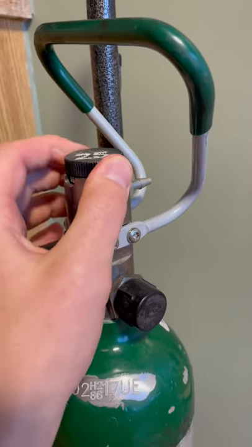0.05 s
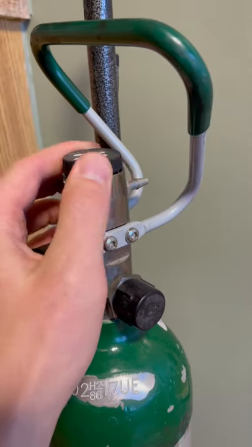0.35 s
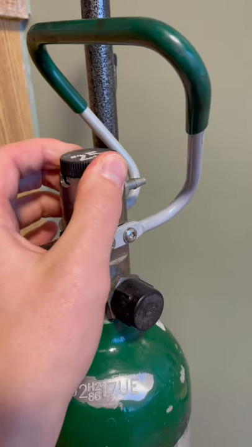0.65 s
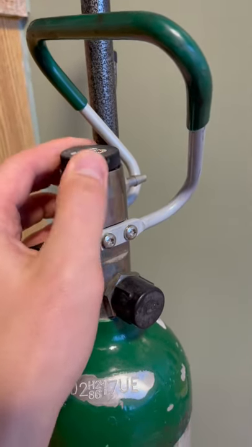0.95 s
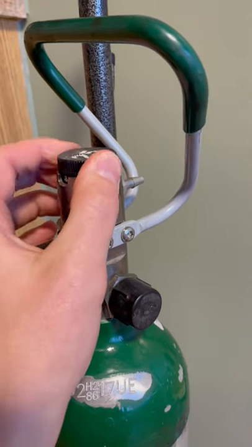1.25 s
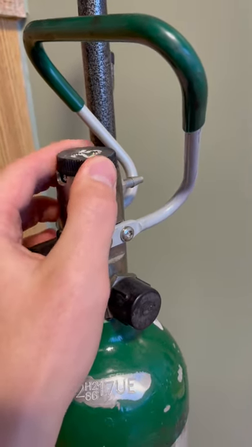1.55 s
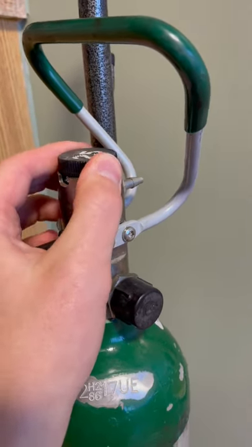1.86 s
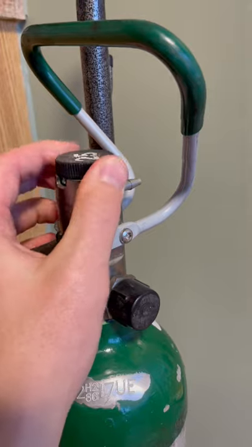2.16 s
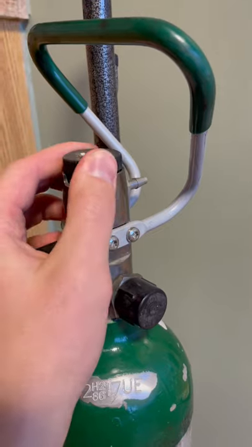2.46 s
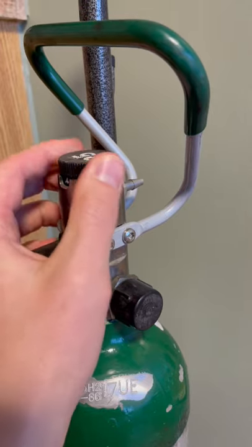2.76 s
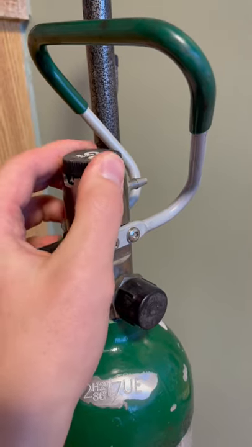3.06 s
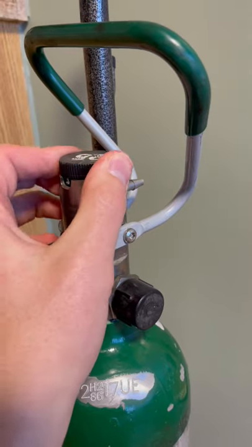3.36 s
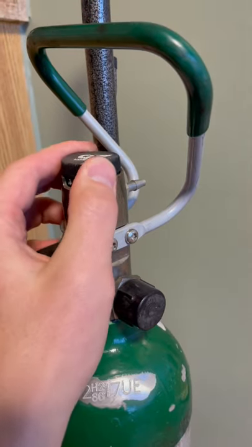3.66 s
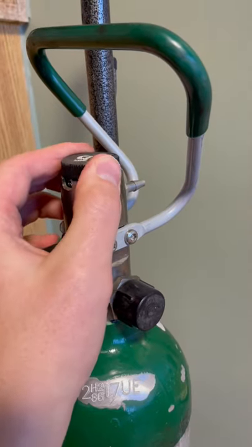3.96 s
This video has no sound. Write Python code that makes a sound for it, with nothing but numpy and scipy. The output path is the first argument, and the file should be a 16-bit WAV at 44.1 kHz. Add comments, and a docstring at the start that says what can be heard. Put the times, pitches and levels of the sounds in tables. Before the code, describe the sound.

Gas hisses from a cylinder's regulator close by, high-pitched and slightly fluttering, for the whole four seconds. The knob clicks lightly as it is turned, at about 0.6, 1.2, 1.9, 2.5, 3.3 and 3.9 seconds. The hiss is loudest at first, drops with the click at 1.2 seconds and drops again at 2.5, then carries on more softly. A faint low rumble of a small room lies underneath.

```python
"""In a small, faintly rumbling room, gas hisses close by from the outlet of a cylinder's regulator.
The turbulent jet is a broadband source: it excites the nearly evenly spaced resonances of the
outlet bore and flutters a little. A hand turns the knob through its detents. Each is an impact
that sets knob and regulator in damped free vibration, and the hiss drops in two steps."""
import sys
import numpy as np
from scipy import signal
from scipy.fft import rfft, irfft
from scipy.io import wavfile

SR = 44100
rng = np.random.default_rng(int(sys.argv[2]) if len(sys.argv) > 2 else 0)


def bounce(signal):
    """Save signal as a 16-bit WAV file at the path given by the first command-line argument."""
    frames = np.transpose(np.atleast_2d(signal))
    limited = np.clip(frames, -1, 1)
    pcm = np.round(limited * 32767).astype(np.int16)
    wavfile.write(sys.argv[1], SR, pcm)


N = 176400
FREQS = np.maximum(np.fft.rfftfreq(N, 1 / SR), 1)

# Likeness of the noise in the two channels: (frequency [Hz], coherence [0-1])
COHERENCE = [(60, .999), (150, .99), (280, 0.97), (550, 0.21), (1000, 0.6), (1300, 1), (2400, 1),
             (3200, 0.96), (3450, 0.88), (4200, 0.94), (4800, 0.1), (6000, 1), (7700, 0.41), (9500, 1),
             (13600, 1), (14300, 0.98), (15600, 0.72)]
# Room rumble, halfway through its rise: (frequency [Hz], spectral density [dB])
RUMBLE_SPECTRUM = [(20, -106), (32, -94), (46, -80), (55, -80), (67, -73.5), (85, -81), (107, -74),
                   (135, -80), (158, -77.5), (185, -86.5), (210, -78), (260, -83.5), (350, -88.5),
                   (500, -100), (1000, -110), (3000, -116)]
# Detent impacts: (time [s], level [dB], relative tick [dB], relative hollow ring [dB], knock pitch [Hz])
DETENTS = [(.582, -51, 3, -16, 1650), (.586, -50, -1, -16, 830), (.594, -53, 0, -15, 760),
           (1.202, -46, 1, -18, 1700), (1.205, -43, -6, -20, 1700), (1.212, -47, -4, -18, 820),
           (1.816, -57, -3, -14, 1050), (1.829, -59, -3, -14, 800), (1.842, -59, -3, -14, 700),
           (1.942, -53, 3, -18, 1320), (2.472, -54, 3, -22, 1450), (2.507, -48, 5, -14, 1340),
           (2.513, -50, 0, -4, 780), (3.283, -53, 14, -12, 1000), (3.289, -56, 2, -14, 780),
           (3.484, -63, -2, -10, 800), (3.91, -58, 3, -20, 1550)]
# Modes of knob and regulator: (frequency [Hz], relative level [dB], T60 [s])
KNOB_MODES = [(266, -5, .05), (444, -10, .04), (820, -4, .022), (1070, -9, .015), (1340, -7, .03),
              (2140, -3, .04)]
# Modes of the sharp tick; the two highest are a brief puff of gas sounding the bore's resonances: (frequency
# [Hz], relative level [dB], T60 [s])
TICK_MODES = [(2990, -4.5, .07), (4580, -1, .06), (10500, 4, .01), (15500, 4, .012)]
# Hiss gain by register: (time [s], low [dB], whistle [dB], treble [dB], top [dB])
REGISTER_GAINS = [(0.0, 6.5, -1.5, 3.5, 5), (0.2, 4, 0, 3.5, 6), (0.45, 5.5, 2.5, 1.5, 7),
                  (0.53, 4.5, -1, 4.5, 7), (0.565, 4, -4, 1.5, 3.5), (0.64, 2.5, 5, 3, 3),
                  (0.9, 2.5, 3.5, 3.5, 3.5), (1.12, 4, 7.5, 4, 4.5), (1.159, -0.3, -3, -1.6, -0.3),
                  (1.72, 0.9, -3, -0.2, 0.4), (1.98, -3.5, -0.5, -1.5, -4), (2.22, -1, -1.5, -2.5, -3),
                  (2.36, -1.3, 0.5, -1.1, -1), (2.495, -2.5, -0.3, -2, -2.5),
                  (2.525, -7.5, -7.5, -4.5, -7.5), (3.0, -8, -6, -5.0, -9.5), (3.24, -10, -9, -6, -8),
                  (3.272, -6, -12, -7, -6), (3.34, -8, -5, -3, -9.5), (3.8, -5, -3, -2.5, -11.5),
                  (3.87, -9, -7.5, -6, -7), (3.92, -3.5, -1.5, -1, -3), (4.0, -11.5, -14, -8, -5)]
# Boundaries of the six bands, each of which follows one register: (frequency [Hz])
BAND_EDGES = [1900, 4900, 5700, 6300, 11700]
# Broad rush of the jet: (frequency [Hz], base spectral density [dB])
RUSH_SPECTRUM = [(200, -104), (500, -100.5), (900, -96.5), (1200, -100), (3000, -101), (15000, -104)]
# Resonances of the outlet bore: (centre [Hz], bandwidth [Hz], base spectral density [dB])
BORE_MODES = [(1529.0, 335.0, -79.0), (2249.0, 346.0, -78.0), (2777.0, 891.0, -84.0),
              (3712.0, 348.0, -83.0), (4352.0, 457.0, -81.0), (4771.0, 200.0, -84.0),
              (5319.0, 494.0, -71.0), (5978.0, 275.0, -64.5), (6591.0, 422.0, -69.7),
              (7305.0, 564.0, -73.0), (8148.0, 467.0, -70.5), (8921.0, 486.0, -70.0),
              (9630.0, 489.0, -69.0), (10460.0, 653.0, -64.3), (11208.0, 547.0, -69.0),
              (11900.0, 260.0, -74.0), (12571.0, 497.0, -81.0), (13470.0, 655.0, -81.0),
              (14181.0, 293.0, -71.2), (14813.0, 391.0, -66.0), (15543.0, 314.0, -57.0)]
# Nearly evenly spaced notches between the hiss's peaks: (frequency [Hz], depth [dB])
HISS_NOTCHES = [(1110, 4), (1210, 9), (1890, 4), (3130, 6), (3450, 3), (3980, 7), (4620, 4.5), (5640, 3),
                (6290, 3), (6950, 3), (7740, 10), (8480, 7), (9220, 3.5), (10830, 1), (11650, 7),
                (12250, 10), (13030, 11), (13790, 9), (14450, 6), (15150, 3.5)]
# Narrow fixed peaks that faintly colour the hiss: (frequency [Hz], lift [dB])
RIPPLE_PEAKS = [(2990, 4), (5140, 4), (5474, 4), (5939, 2.5), (5977, 3.5), (6534, 3.5), (7207, 3.5),
                (8050, 2), (8182, 2), (8925, 2.5), (9760, 2.5), (10550, 2.5), (10935, 4), (14644, 3),
                (14911, 3.5), (15183, 4.5), (15465, 3)]
# Phase between the channels, in opposite polarity at 10.3-13.5 kHz: (frequency [Hz], left lead [rad])
CHANNEL_PHASE = [(20, 0), (2600, 0), (3100, 1.4), (3250, .7), (3340, 1.3), (3420, 2.9), (3490, np.pi),
                 (3620, 1.2), (4000, 0), (4600, .3), (5300, 1.1), (6000, 1.4), (8000, 2.3), (9300, 2.85),
                 (10300, np.pi), (13500, np.pi), (14500, 3.75), (15600, 4.3)]
# Level difference between the channels: (frequency [Hz], left over right [dB])
CHANNEL_BALANCE = [(60, 0), (180, .5), (380, 2.5), (800, 0.27), (2400, 0), (3440, -2.3), (5000, 1.2),
                   (7000, 0)]

RUMBLE_RISE_DB_PER_S = 1
REFLECTION_DB, ROOM_T60_S, WALL_CUT_HZ = -8.5, .27, 1400
KNOCK_DB, KNOCK_T60_S = 4, .035
CLACK_DB, CLACK_T60_S, CLACK_BAND_HZ = 6.5, .04, (550, 1700)
CRACK_DB, CRACK_T60_S, CRACK_LOW_HZ = 8, .009, 450
HOLLOW_HZ, HOLLOW_T60_S = 737, .16  # the regulator body rings on after some detents
MODE_SCATTER_DB = 1.5
NOTCH_WIDTH_HZ, RIPPLE_WIDTH_HZ = 52, 9.4
HISS_DB, RUSH_DB_PER_LOW_DB = -.5, 1.54
# Random fluctuations of level: (standard deviation [dB], corner frequency [Hz])
FLUTTER = (.44, 50)  # of the whole jet
FLICKER, WHISTLE_FLICKER, TOP_FLICKER = (1.45, 5.8), (.2, 140), (.8, 5.8)  # of each resonance alone
CUTOFF_HZ = 15750


def from_db(db):
    """Amplitude ratio: tenfold for every 20 dB."""
    return 10 ** (np.asarray(db) / 20)


def at_hz(points, hz):
    """Linear interpolation on a logarithmic frequency axis."""
    f, value = np.transpose(points)
    return np.interp(np.log(hz), np.log(f), value)


def drift(spread, corner_hz):
    """Random modulation: low-passed Gaussian noise with standard deviation `spread`."""
    hz = np.fft.rfftfreq(4096, N / SR / 4096)
    slow = irfft(rfft(rng.standard_normal(4096)) / (1 + (hz / corner_hz) ** 2))
    return spread * np.interp(np.linspace(0, len(slow) - 1, N), np.arange(len(slow)), slow / slow.std())


def noise(density):
    """Partial coherence: independent mid and side noises add to a given amplitude per root hertz."""
    coherence = np.clip(at_hz(COHERENCE, FREQS), 0, 1)
    shape = (2, len(FREQS))
    mid, side = (rng.standard_normal(shape) + 1j * rng.standard_normal(shape)) * np.sqrt(N * SR / 2) / 2
    spectrum = np.sqrt(1 + coherence) * mid + np.sqrt(1 - coherence) * side * [[1], [-1]]
    return irfft(density * spectrum, N)


def butterworth(x, hz, kind):
    """Band limiting by a maximally flat filter, 12 dB per octave on each slope."""
    return signal.sosfilt(signal.butter(2, hz, kind, fs=SR, output="sos"), x)


def ring(impulses, hz, t60):
    """Damped harmonic oscillator: a unit impulse starts a decaying sine of unit amplitude."""
    r, w = from_db(-60 / (t60 * SR)), 2 * np.pi * hz / SR
    return signal.lfilter([0, np.sin(w)], [1, -2 * r * np.cos(w), r * r], impulses + 1e-18)


def burst(impulses, t60):
    """Exponential decay: each impulse starts a dying burst of noise."""
    envelope = signal.lfilter([1], [1, -from_db(-60 / (t60 * SR))], impulses + 1e-18)
    return envelope * rng.standard_normal(N)


def room_rumble():
    """Ambient noise: a continuous spectrum, strongest at low frequencies, slowly rising in level."""
    rise_db = RUMBLE_RISE_DB_PER_S * (np.arange(N) - N / 2) / SR
    return noise(from_db(at_hz(RUMBLE_SPECTRUM, FREQS))) * from_db(rise_db)


def room_reflections(x):
    """Diffuse reverberation: dense, dull reflections decay exponentially, independently on each side."""
    t = np.arange(SR // 2) / SR
    tail = rng.standard_normal((2, len(t))) * from_db(-60 * t / ROOM_T60_S) * (t > .003)
    tail /= np.sqrt(np.sum(tail ** 2, axis=1, keepdims=True))
    tail = butterworth(tail, WALL_CUT_HZ, "low")
    return signal.fftconvolve(np.atleast_2d(x), tail, axes=1)[:, :N]


def knob_detents():
    """Impact excitation: each detent rings the modes of knob and regulator, with brief bursts of noise."""
    times, db, tick_db, hollow_db, knock_hz = np.transpose(DETENTS)
    onsets = (times * SR).astype(int)

    def impacts(levels_db):
        """Impulsive forcing: one pulse at each detent."""
        return np.bincount(onsets, from_db(levels_db), N)

    scatter_db = MODE_SCATTER_DB * rng.standard_normal((len(times), len(KNOB_MODES)))
    body = sum((-1) ** k * ring(impacts(db + level + scatter_db[:, k]), hz, t60)
               for k, (hz, level, t60) in enumerate(KNOB_MODES))
    knock = sum(ring(np.bincount([onset], [gain], N), hz, KNOCK_T60_S)
                for onset, gain, hz in zip(onsets, from_db(db + KNOCK_DB), knock_hz))
    clack = butterworth(burst(impacts(db + CLACK_DB), CLACK_T60_S), CLACK_BAND_HZ, "band")
    hollow = ring(impacts(db + hollow_db), HOLLOW_HZ, HOLLOW_T60_S)
    ticks = impacts(db + tick_db)
    sharp = sum(from_db(level) * ring(ticks, hz, t60) for hz, level, t60 in TICK_MODES)
    crack = from_db(CRACK_DB) * butterworth(burst(ticks, CRACK_T60_S), CRACK_LOW_HZ, "high")
    return body + knock + clack + hollow + sharp + crack


def hiss_colour():
    """Interference, as a fixed gain curve: a near wall notches the hiss, room reflections ripple it."""
    cuts = sum(db * np.exp(-((FREQS - hz) / NOTCH_WIDTH_HZ) ** 2) for hz, db in HISS_NOTCHES)
    lifts = sum(db / (1 + ((FREQS - hz) / RIPPLE_WIDTH_HZ) ** 2) for hz, db in RIPPLE_PEAKS)
    return from_db(lifts - cuts)


def gas_jet():
    """Forced resonance: turbulence drives the bore's modes, each flickering alone, over a broad rush."""
    times, *gains_db = np.transpose(REGISTER_GAINS)
    low, whistle, treble, top = [np.interp(np.arange(N) / SR, times, db) for db in gains_db]
    bands = [(treble, FLICKER),  # the lowest resonance follows the treble
             (low, FLICKER), (treble, FLICKER), (whistle, WHISTLE_FLICKER),
             (treble, FLICKER), (top, TOP_FLICKER)]
    jet = from_db(RUSH_DB_PER_LOW_DB * low) * noise(from_db(at_hz(RUSH_SPECTRUM, FREQS)))
    for hz, width, db in BORE_MODES:
        register_db, flicker = bands[np.searchsorted(BAND_EDGES, hz)]
        resonance = 1 / (1 + (2 * (FREQS - hz) / width) ** 2)
        jet += from_db(db + register_db + drift(*flicker)) * noise(resonance)
    return jet * from_db(HISS_DB + drift(*FLUTTER))


def scene():
    """Superposition: the room's rumble, the clicks with their reflections and the hiss add linearly."""
    hiss = irfft(rfft(gas_jet()) * hiss_colour(), N)
    clicks = knob_detents()
    reflections = from_db(REFLECTION_DB) * room_reflections(clicks)
    return room_rumble() + reflections + clicks + hiss


def record(dry):
    """Linear filtering: the channels differ in treble phase and a little in level; the top is cut off."""
    split = np.array([[.5], [-.5]])  # half of each difference goes to each channel
    phase_shift = np.exp(1j * split * at_hz(CHANNEL_PHASE, FREQS))
    balance = from_db(split * at_hz(CHANNEL_BALANCE, FREQS))
    low_pass = 1 / np.sqrt(1 + (FREQS / CUTOFF_HZ) ** 1500)
    return irfft(rfft(dry) * phase_shift * balance * low_pass, N)


dry = scene()
out = record(dry)
bounce(out)
```